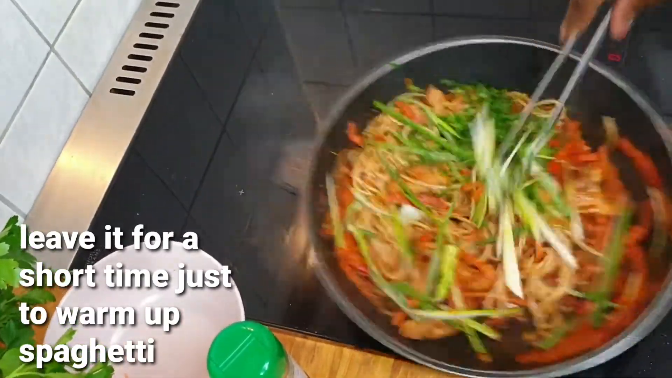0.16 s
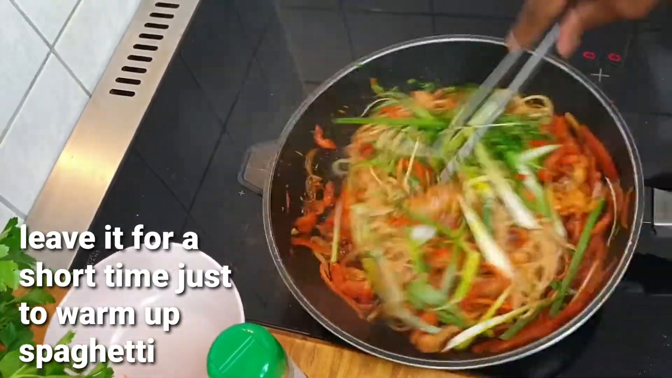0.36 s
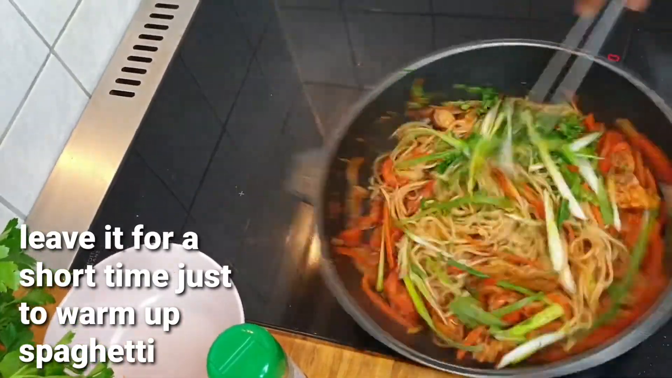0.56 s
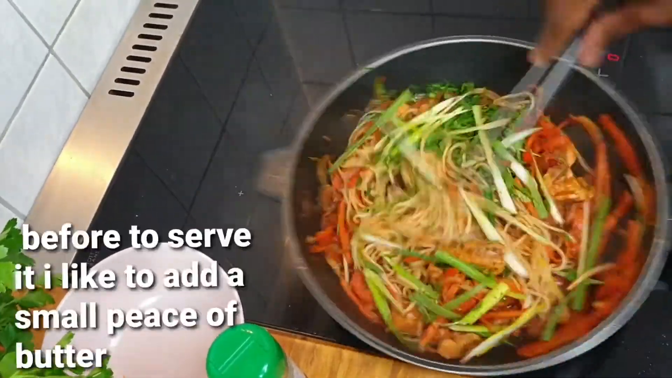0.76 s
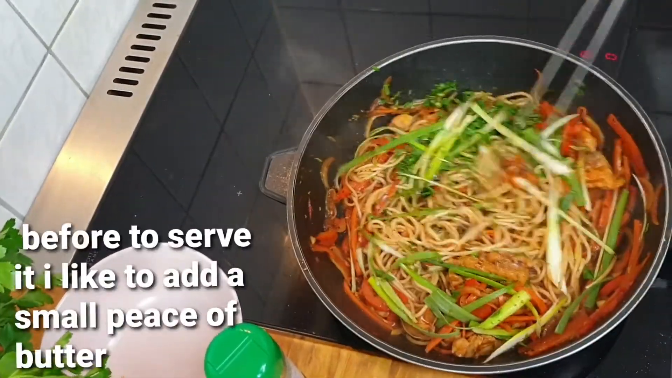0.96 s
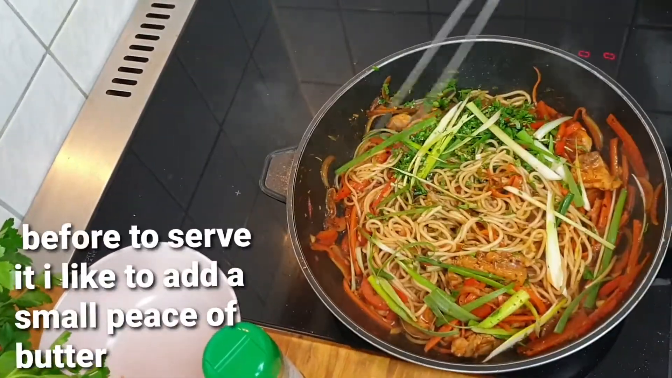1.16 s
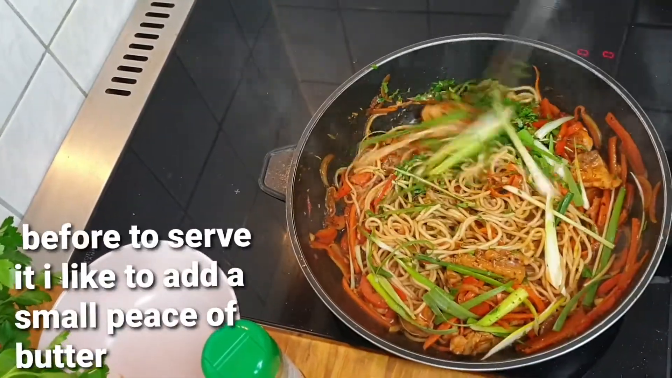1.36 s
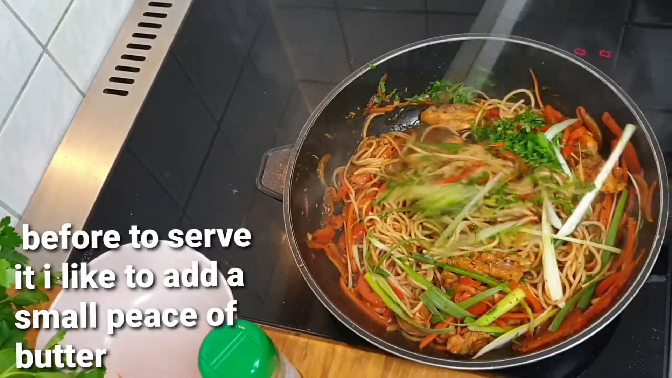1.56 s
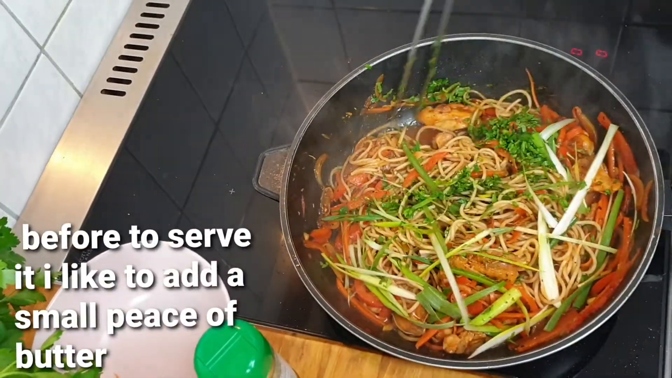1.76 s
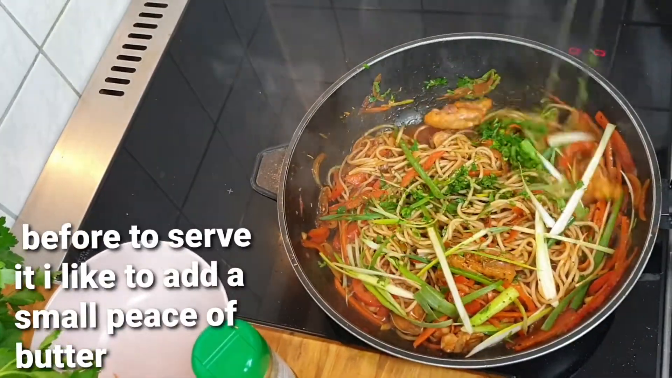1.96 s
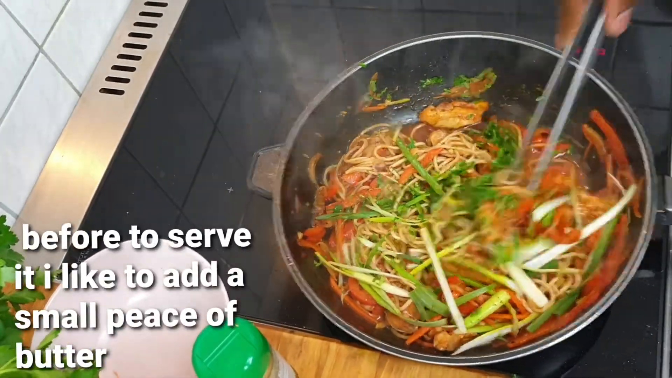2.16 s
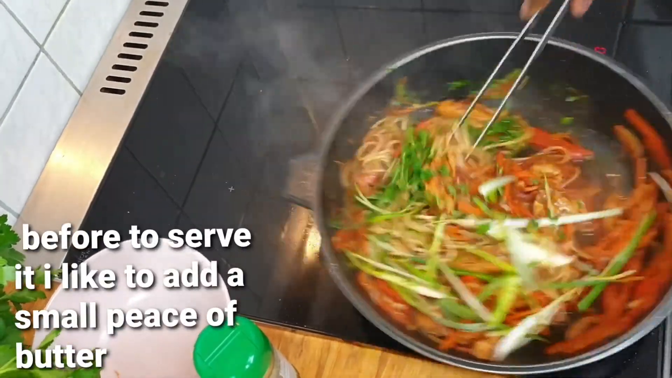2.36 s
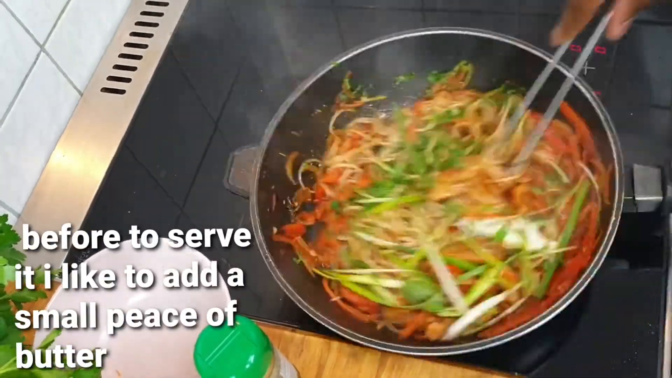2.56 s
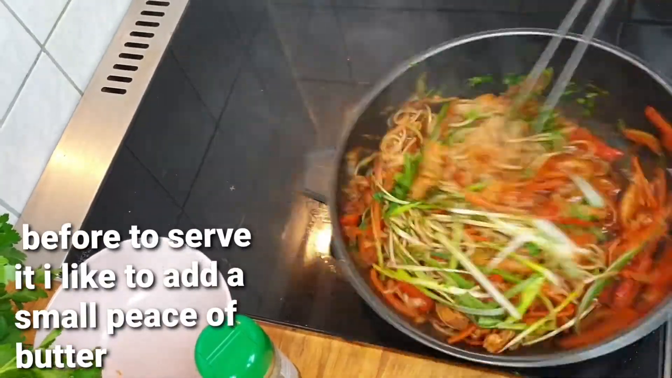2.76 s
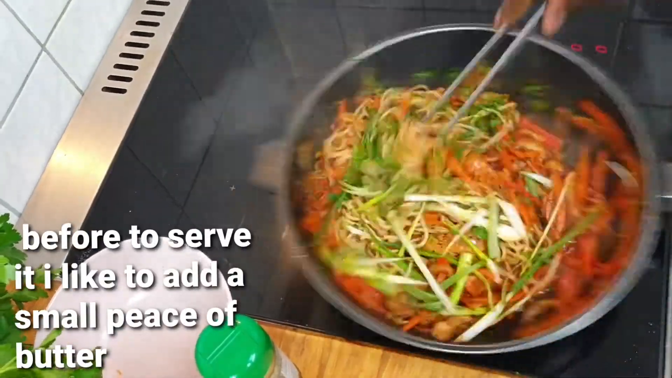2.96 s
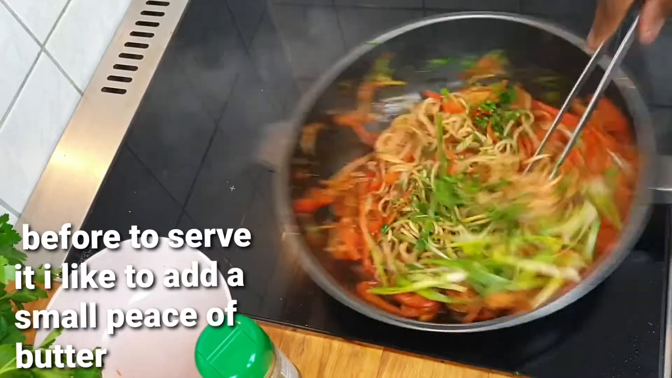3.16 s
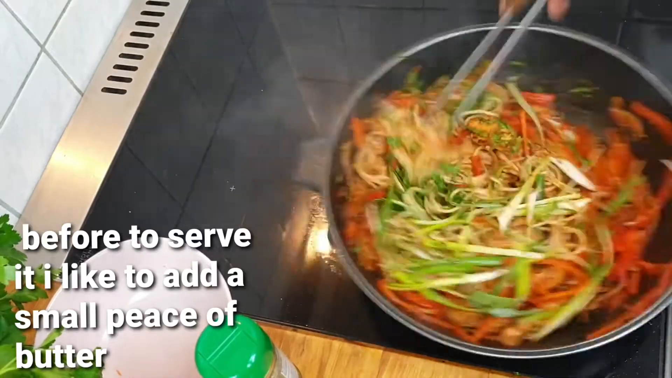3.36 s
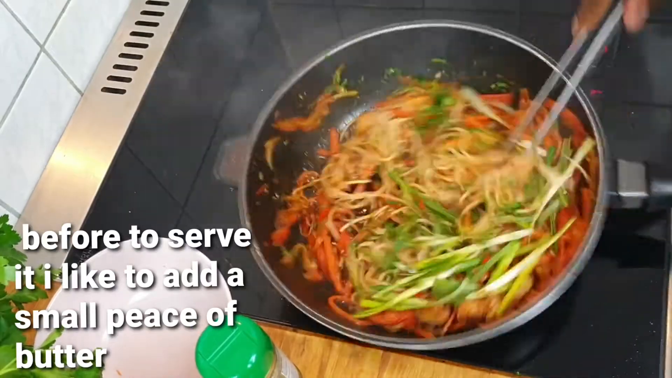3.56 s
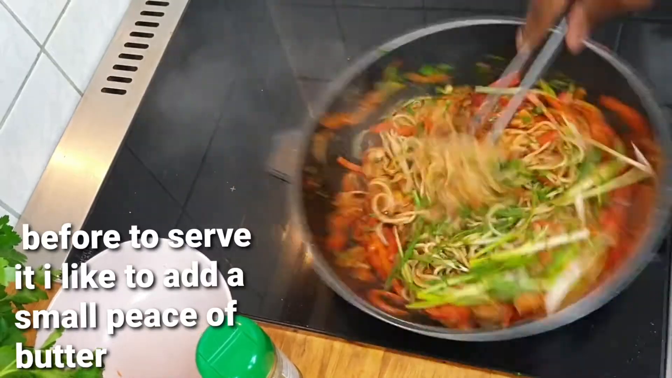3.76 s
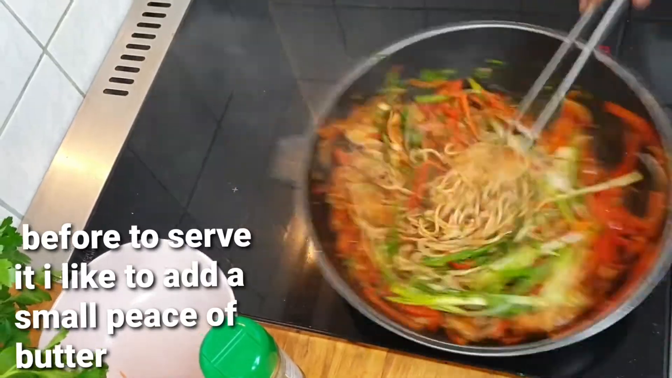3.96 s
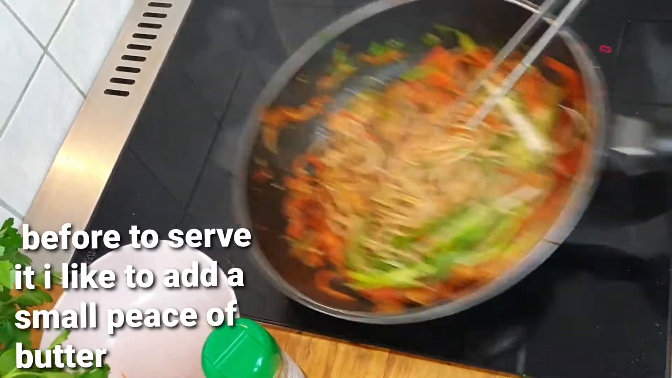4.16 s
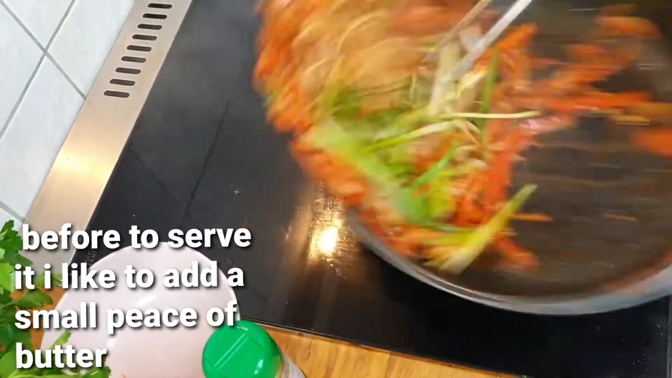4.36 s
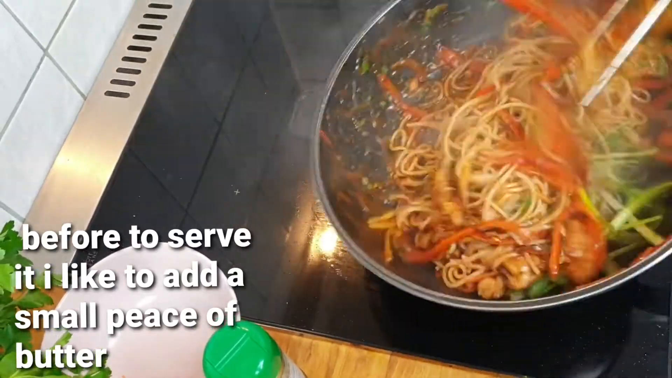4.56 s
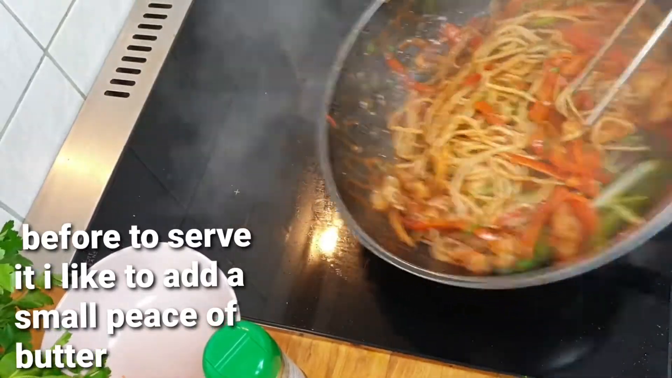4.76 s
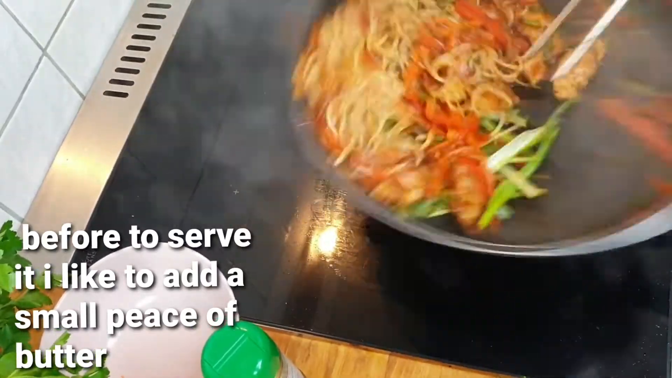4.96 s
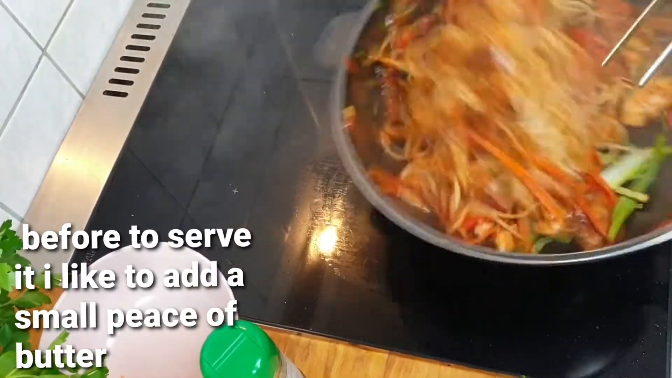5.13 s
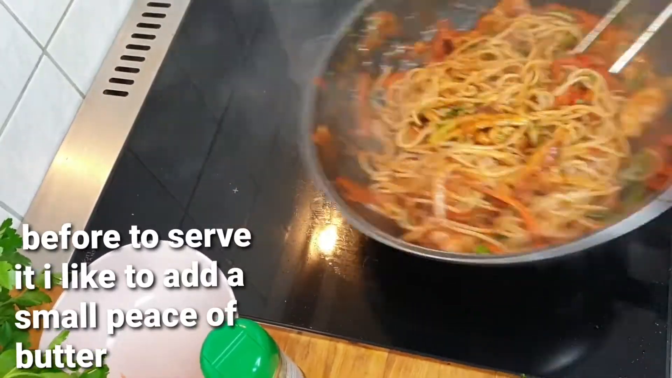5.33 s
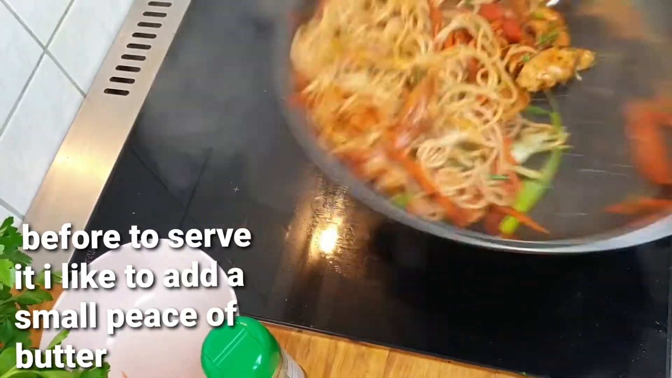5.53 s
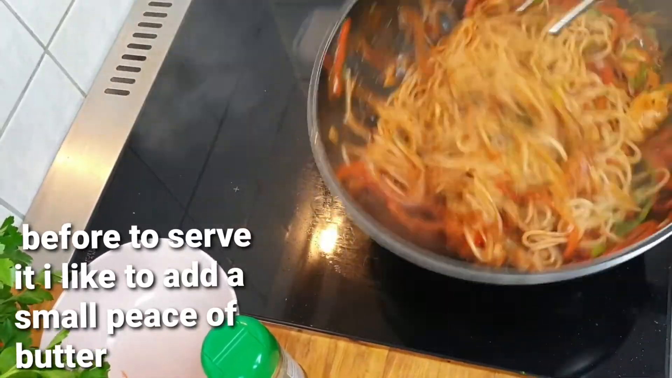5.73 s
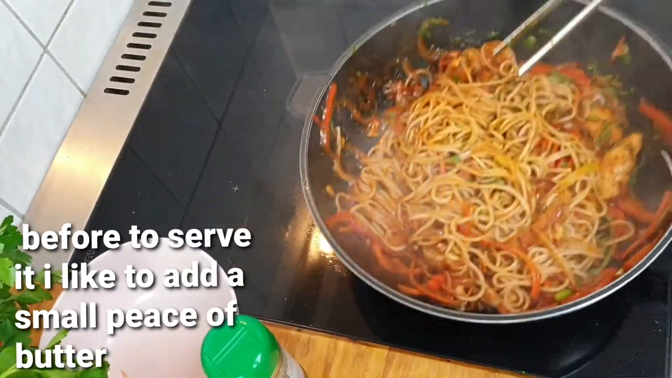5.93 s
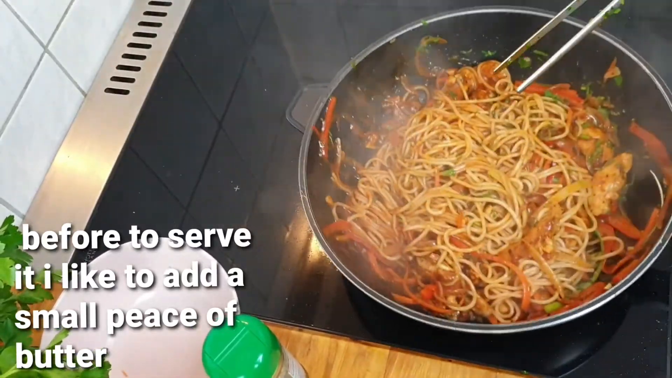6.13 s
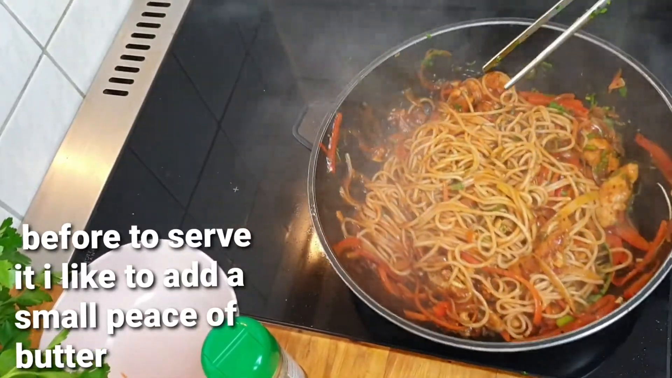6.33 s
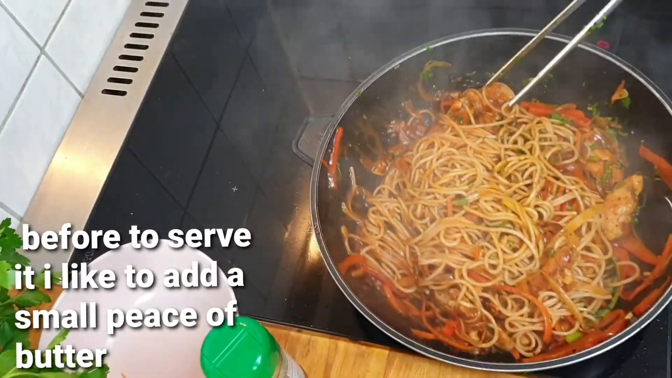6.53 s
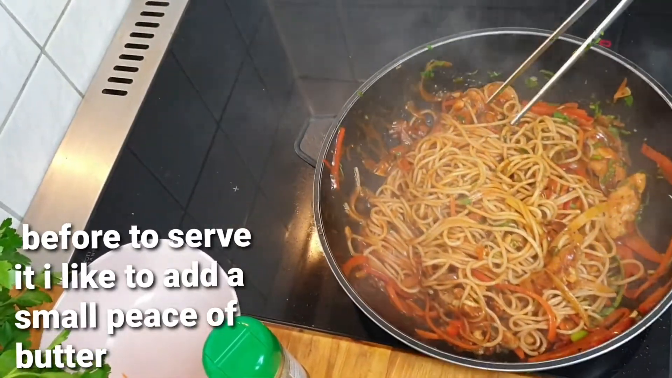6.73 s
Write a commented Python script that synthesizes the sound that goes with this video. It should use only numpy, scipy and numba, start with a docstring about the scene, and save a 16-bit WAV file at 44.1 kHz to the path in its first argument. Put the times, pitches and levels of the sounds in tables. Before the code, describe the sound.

A close phone microphone catches a pan being shaken on a glass hob: dull knocks, grinding base, thin metallic tong clinks and two brief squeaky drags. Light sizzle flares and fades over a low extractor fan, with a faint high whistle in the first half. After a quieter spell with the pan raised, a heavy landing booms and rings, followed by a few knocks. Short hard kitchen echo.

```python
"""A pan thuds on a glass hob amid sizzling while steel tongs, tossing spaghetti, clink on it throughout.
Blows are noisy contacts plus decaying modes; two squeaking drags are noise through gliding resonances.
Sizzle, sliding, rumble and the extractor fan are filtered noise with moving levels; the sizzle fades
as the pan is lifted. Thin whistles flutter; the small tiled kitchen echoes the metal; a phone hears it from above.
"""
import sys
import numpy as np
from scipy import signal
from scipy.fft import rfft, irfft, next_fast_len
from scipy.io import wavfile
from scipy.ndimage import uniform_filter1d
from numba import njit

SR = 44100
rng = np.random.default_rng(int(sys.argv[2]) if len(sys.argv) > 2 else 0)


def bounce(signal):
    """Save signal as a 16-bit WAV file at the path given by the first command-line argument."""
    frames = np.transpose(np.atleast_2d(signal))
    limited = np.clip(frames, -1, 1)
    pcm = np.round(limited * 32767).astype(np.int16)
    wavfile.write(sys.argv[1], SR, pcm)


N = 299439  # samples, 6.79 s
HIT = 16384  # samples in one blow
HARDER_IS_SHORTER = 0.45  # dB of rise time lost for each dB of blow
HARDER_IS_DAMPED = 0.26  # dB of ring life lost for each dB of blow, as the hand bears down
NOTE_SPREAD, NOTE_LIFE = 0.07, 0.7  # reach of the loudest note [log frequency]; share of the ring it leads
BEAT_DEPTH = 0.65  # share of the ring level

# Tong tips landing on the pan, before the microphone's colour:
# (time [s], peak in 4-12 kHz [dB], 300-1500 Hz offset [dB], 1500-4000 Hz offset [dB], 8-12 kHz offset [dB],
#  loudest note [Hz], its lead [dB], clatter t60 [s], ring against clatter [dB])
TIP_BLOWS = [(0.151, -21, -4, -6, -7, 9100, 10, 0.057, -5),
             (0.4246, -17.5, -18.5, -14, -15, 9650, 17, 0.096, -6.5),
             (0.6898, -36, -39, -8, -14, 5040, 3, 0.05, -16),
             (0.838, -24.5, -32, 1.5, -2, 7560, 18.5, 0.064, 5),
             (0.8595, -27.5, -2, -8.5, -13, 3560, 33, 0.136, -6),
             (1.4797, -6, -21.5, -29, 0.5, 9600, 2, 0.058, -12.5),
             (1.4835, -6.5, -28, -18.5, 0, 7900, 6, 0.045, -4),
             (1.491, -14, -15, -19.5, -3, 1915, 21.5, 0.19, -9.5),
             (1.981, -36, -16, -4.5, -11.5, 7300, 11, 0.22, -9),
             (2.163, -33, 1, -10, -8.5, 8860, -3, 0.046, -2),
             (2.2992, -20.5, -16, -12, -12, 8500, 2, 0.1, -10),
             (2.6105, -30, -4, -8, -5.5, 894, 14, 0.23, -3),
             (2.6326, -18.5, -10, -9.5, -10.5, 8300, 17, 0.093, -7),
             (2.957, -25.5, 1, -21, -5.5, 9600, 13, 0.048, -4),
             (3.266, -34.5, -18, -10, -16, 3870, 6, 0.27, -1),
             (3.2847, -16, -3, -11, -5.5, 1920, 31, 0.14, -9.5),
             (3.379, -44, -4, 5, -14, 1900, 4, 0.077, 2), (3.495, -31, -10, -3.5, -15, 1200, 32, 0.34, 3.5),
             (3.577, -35, -7, -9, -13, 1070, 4, 0.07, -4),
             (3.5947, -20.5, 3.5, -5, -1.5, 8500, 15, 0.11, -6.5),
             (3.7898, -37, 3.5, -8, -12, 1100, 3, 0.3, -3), (4.0882, -42.5, -26, 1, 0, 8560, 8, 0.47, -11),
             (4.243, -40.5, -20, -12, 6, 10100, 3, .04, -12),
             (4.3765, -36.5, -8, -3, 1, 10000, 20, .09, -13),
             (4.5105, -18, -12, -5, -15, 1920, 19, 0.11, 5.5),
             (4.5132, -17.5, -14.5, -10, -22.5, 2120, 8, 0.24, 2.5),
             (4.5225, -29.5, -9, -15, -29, 2186, 18, .2, -6),
             (4.7097, -38.5, -3, -5.5, -5.5, 1390, 6, 0.74, -4),
             (4.9132, -42, -5, -4, -5, 1080, 7, 0.17, -6), (4.9372, -40.5, -20, -30, 2, 9150, 7, 0.29, -16),
             (4.96, -45, -15, -17, -3, 9200, 5, 0.051, -12), (5.033, -49, -22, -15, 2, 8900, 5, 0.067, -11),
             (5.196, -48, -18, -20, -1, 9100, 4, .08, -9.5),
             (5.522, -39.5, -35, -4.5, -11, 9430, 31.5, 0.17, -12)]
# Modes of the pan ringing freely: (frequency [Hz], level [dB], t60 [s])
PAN_MODES = [(660, -8, .12), (930, -7, .1), (1050, -4, .15), (1200, -8, .1), (1715, -10, .15),
             (1915, -2, .15), (2186, -1, .16), (2466, -7, .06), (2700, -6, .13), (3550, -9, .12),
             (3720, -7, .1), (4410, -5, .2), (4740, -12, .1), (5020, -8, .13), (5550, -5, .1),
             (6050, -8, .1), (6720, -6, .09), (7750, -5, .07), (8100, -5, .09), (8400, -4, .06),
             (8930, -5, .09), (9220, -4, .09), (9460, -5, .09), (10030, -8, .07), (10700, -10, .05)]


def clinks():
    """Impact between stiff bodies: brief contact is bright; wall and base share by where the tips land."""
    def tone(base_db, wall_db, top_db):
        return [(150, base_db), (900, base_db + 9.5), (2200, wall_db + 7.5), (3300, wall_db + 10),
                (5500, 0.42), (9000, top_db + 12), (14000, top_db + 9.5)]
    return hits(TIP_BLOWS + ticks(), PAN_MODES, tone, [4000, 12000], rise_s=0.0014, life=0.99)


def ticks(count=14):
    """Independent random arrivals: faint touches of the tips, as rows with the columns of the tip blows."""
    rows = []
    for when, size in rng.random((count, 2)):
        level_db = -54 + 3 * (2 * size - 1)
        rows.append((when * N / SR, level_db, -16, -18, 0, 9000, 6, 0.07, -8))
    return rows


# Pan base landing on the glass, before the microphone's colour:
# (time [s], peak in 250-1500 Hz [dB], bass offset [dB], 1.5-3 kHz offset [dB], treble offset [dB],
#  loudest note [Hz], its lead [dB], clatter t60 [s], ring against clatter [dB],
#  boom near 100 Hz [dB], hum at 240-320 Hz [dB])
BASE_BLOWS = [(0.016, -21, -32, -5, -12, 1464, 39, 0.079, -2, -60, -50),
              (0.027, -19.5, -9, -11, -17, 560, 5, 0.16, -3, -38, -40),
              (0.206, -22.5, -14, -3, -28, 870, 11, 0.092, 0, -58, -55),
              (0.219, -15.5, -22, -16, -18, 810, 1, 0.28, 6.5, -36, -35.5),
              (0.493, -29.5, -11, -4.5, -14, 600, 22, 0.083, 1.5, -41.5, -43),
              (0.635, -40, -12, -7, -2, 640, 15, 0.24, 0, -43, -45.5),
              (1.994, -34, -11, -5, 3.5, 560, 15, 0.34, 5, -44, -48),
              (2.036, -42.5, -6, -1, -9, 200, -1, 0.51, -6, -43.5, -64),
              (2.71, -33, -4, -12.5, -9.5, 200, 7, 0.34, -3.5, -34.5, -49),
              (2.723, -31.5, -8, -11, -4, 560, 15, 0.36, 2, -62, -48),
              (2.941, -36, -9, -2.5, -2, 460, 5, 0.68, -3.5, -43.5, -60),
              (3.105, -33, -9, 3, 4.5, 1184, 26, 0.14, 1.5, -53, -53),
              (3.39, -33, -17, -13, -12, 460, 20, .08, 4, -60, -53),
              (3.3943, -17, -15, -9, -9, 740, 22, 0.15, 10, -40, -37.5),
              (3.414, -21.5, -22, -33, -11, 660, 29, 0.4, 9, -59, -37.5),
              (3.8, -41, -4, -30, -5, 640, 9, 0.17, -20, -45, -62),
              (3.811, -35.5, -5, -21, -4, 560, -9, 0.15, 5, -46.5, -62),
              (4.167, -43.5, 0, -3, -26, 200, 2, 0.18, 8, -47, -58),
              (5.272, -42, -27, -1, -4, 1400, 29, 0.19, 3, -66, -72),
              (5.599, -43.5, -7.5, -10.5, -11.5, 200, 4, 0.12, 2, -65, -51.5),
              (6.0046, -5.5, -18, -8, -7.5, 690, 13, 0.13, 3, -34, -26),
              (6.04, -15, -28, -26, -18, 765, 11.5, 0.4, 6, -62, -39),
              (6.066, -19, -8, -22, -23, 640, 25, 0.3, 6, -48, -58),
              (6.258, -44, -15, -33, -34, 460, 5.5, 0.17, -9, -44, -54),
              (6.317, -17, -19, -9, -12, 1178, 20, 0.22, 7.5, -45.5, -38.5)]
# Modes of the hob ringing freely: (frequency [Hz], level [dB], t60 [s])
HOB_MODES = [(200, -2, .12), (371, -4, .2), (460, -3, .16), (560, -3, .16), (640, -1, .18), (700, 0, .15),
             (764, -2, .18), (899, -2, .16), (1030, -2, .13), (1178, -3, .08), (1420, -4, .1),
             (1560, -6, .1), (1750, -6, .1), (1925, -1, .12), (2190, -3, .12), (2450, -3, .09),
             (2650, -4, .08)]


def thuds():
    """Impact of a heavy base over a broad area: slow contact favours the low modes of the glass."""
    def tone(bass_db, knock_db, top_db):
        return [(40, bass_db - 18), (110, bass_db + 10.5), (300, -2.8), (1200, -0.26), (1900, knock_db + 5),
                (2700, knock_db - 4), (3600, top_db - 3.5), (5500, top_db - 4.5), (11000, top_db - 16)]
    rows = [row[:-2] for row in BASE_BLOWS]  # boom and hum are played by booms()
    return hits(rows, HOB_MODES, tone, [250, 1500], rise_s=0.0047, life=0.94)


# Deepest modes of the hob: (frequency [Hz], level against boom or hum [dB], t60 [s])
GLASS_MODES = [(95.4, 3.5, 0.3), (110.1, 3.5, 0.47), (246.2, 0, 0.46), (261.3, -3.5, 0.41), (315, -2, .5)]


def booms():
    """Modal superposition: each landing swells the deepest glass modes, which beat as they fade."""
    out = np.zeros(N + SR)
    t = np.arange(SR) / SR
    swell = 1 - np.exp(-t / 0.015)
    for row, phases in zip(BASE_BLOWS, rng.random((len(BASE_BLOWS), len(GLASS_MODES)))):
        start = int(row[0] * SR)
        boom_db, hum_db = row[-2:]
        for (hz, db, t60), phase in zip(GLASS_MODES, phases):
            gain = undb(db + (boom_db if hz < 150 else hum_db))
            out[start:start + SR] += swell * gain * np.sin(2 * np.pi * hz * t + phase) * fade(t, t60)
    return out[:N]


def hits(table, modes, tone_of, band_hz, rise_s, life):
    """Superposition in time of blows scaled to their band peaks; rise_s holds at -12 dB, life at -22 dB."""
    out = np.zeros(N + HIT)
    band = signal.butter(2, band_hz, "bandpass", fs=SR, output="sos")
    chances = rng.standard_normal((len(table), HIT + 64))
    for (s, db, *offsets, note_hz, note_db, t60, ring_db), chance in zip(table, chances):
        rise = rise_s * undb(-HARDER_IS_SHORTER * (db + 12))
        damped_life = life * undb(-HARDER_IS_DAMPED * (db + 22))
        blow = strike(modes, tone_of(*offsets), note_hz, rise, t60, ring_db, note_db, damped_life, chance)
        peak = np.sqrt(uniform_filter1d(signal.sosfilt(band, blow) ** 2, 128).max())
        start = int(s * SR)
        out[start:start + HIT] += blow * undb(db) / peak
    return out[:N]


def strike(modes, tone, note_hz, rise, clatter_t60, ring_db, note_db, life, chance):
    """Source and resonator: a crack and chattering contacts, with modes left ringing, most near one note."""
    t = np.arange(HIT) / SR
    noise = chance[:HIT]
    bumpy = undb(np.repeat(chance[::64], 64)[:HIT])  # contacts come and go
    dull = signal.lfilter([0.25], [1, -0.75], noise)
    sharp = noise - dull
    contacts = dull * fade(t, clatter_t60) + sharp * fade(t, 0.52 * clatter_t60)  # treble dies sooner
    chatter = np.minimum(t / max(rise, 2e-4), 1) * bumpy * contacts
    chatter += noise * np.minimum(t / 0.0014, 1) * fade(t, 0.018)  # the crack

    # every mode of a slightly uneven body is a close pair, so it beats; food and hand shorten the ring
    ring = np.zeros(HIT)
    for k, (hz, db, t60) in enumerate(modes):
        nearness = np.exp(-(np.log(hz / note_hz) / NOTE_SPREAD) ** 2)
        lead = 1 + (undb(note_db * nearness) - 1) * fade(t, NOTE_LIFE * t60)
        beat = 1 + BEAT_DEPTH * np.sin(2 * np.pi * 0.025 * hz * chance[-2 - k] * t + k)
        tone_wave = np.sin(2 * np.pi * hz * t + 4 * chance[-33 - k])
        ring += undb(db) * lead * tone_wave * fade(t, min(life, 1.2) * t60) * beat
    ring *= np.minimum(t / 0.0013, 1)

    # doubled dB: the minimum-phase step takes the square root of the magnitude
    gains = undb(2 * read(tone, np.linspace(0, SR / 2, 513)))
    prototype = signal.firwin2(1023, np.linspace(0, 1, 513), gains)
    tone_filter = signal.minimum_phase(prototype, n_fft=16384)
    chatter, ring = (signal.fftconvolve(part, tone_filter)[:HIT] for part in (chatter, ring))
    return unit(chatter) + undb(ring_db) * unit(ring)


TIP_DAMPING = 3.5  # factor by which the dragging tip widens the resonances
TIP_SHIFT = 0.098  # share of the pitch change, in log frequency, that the treble resonances follow
# Two drags of a tip over the pan, each a list of
# (time [s], level [dB], low resonances against high [dB], pitch of the resonances [factor])
DRAGS = [
    [(1.5, -40, 0, 1.2), (1.515, -37, -3, 0.98), (1.54, -27.5, -7.5, 0.85), (1.582, -46.5, 5, 0.94),
     (1.615, -30.5, -7, .98), (1.648, -25.5, -15, 0.94), (1.694, -36.5, 1, 0.99), (1.71, -30, -7, 1.03),
     (1.76, -62, 7, 0.76)],
    [(3.495, -27.5, -1.5, 0.9), (3.525, -40, 13, 0.985), (3.537, -45, 2, 1.07), (3.557, -60, 14, 1.05),
     (3.57, -56, 0, 1.04)],
]
# Resonances of the tongs: (frequency [Hz], width before the tip's damping [Hz], level [dB])
TONG_RESONANCES = [(1170, 46, -1.5), (2140, 48, -3.5), (2956, 25, -6), (3620, 44, -5), (4670, 33, -2),
                   (5510, 250, 6), (6590, 73, 3.5), (7480, 57, 3.5), (8370, 38, 2.5), (8900, 61, -0.5),
                   (9420, 60, -4.5), (9700, 170, -0.5)]


def scrapes():
    """Friction excitation: dense uneven slips of the tip shake tong resonances whose pitch wanders."""
    out = np.zeros(N)
    for rows in DRAGS:
        s, db, low_db, pitch = np.transpose(rows)
        a, b = int(s[0] * SR), int(s[-1] * SR)
        t = np.arange(a, b) / SR
        slips = spit(1.7, 1500)[a:b]
        shift = np.interp(t, s, pitch) + 0.006 * walk(25)[a:b]
        low, high = 0, 0
        for hz, width, mode_db in TONG_RESONANCES:
            centre = hz * (shift if hz < 2600 else shift ** TIP_SHIFT)
            once = glide(slips, centre, TIP_DAMPING * width)
            squeak = undb(mode_db) * unit(glide(once, centre, 2 * TIP_DAMPING * width))
            if hz < 2600:
                low = low + squeak
            else:
                high = high + squeak
        rasp_tone = [(2700, -26), (4000, -7), (5500, 0), (8500, -0.5), (10500, 7), (13000, 4.5)]
        rasp = undb(-2) * unit(colour(slips, rasp_tone))  # unpitched
        level = undb(np.interp(t, s, db) + 1.78 * walk(60)[a:b])
        out[a:b] += level * (unit(high) + rasp + undb(np.interp(t, s, low_db)) * unit(low))
    return out


# Relative spectrum of the sizzle: (frequency [Hz], density [dB])
SIZZLE_TONE = [(1180, -56.5), (2000, -8), (2190, -20), (2770, -3.5), (3000, -5.5), (3930, -5), (5360, -3.5),
               (5860, -8.5), (9090, 2.5), (12300, -19), (13200, -41.5), (14000, -48.5)]
# The sauce sizzles while the pan touches the heat: (time [s], level before flutter [dB])
SIZZLE_LEVEL = [(0.0, -49), (0.72, -55), (1.47, -53.5), (1.64, -50), (3.48, -52.5), (3.69, -51.5),
                (3.86, -59), (4.76, -65.5), (5.05, -68.5), (5.46, -61), (5.65, -67.5), (6.03, -69.5),
                (6.2, -69), (6.47, -68), (6.79, -74)]
# Flares as food lands on the hot wall: (time [s], peak before flutter [dB])
FLARE_PEAKS = [(.19, -58), (1.62, -44), (2.25, -66), (4.1, -66), (4.28, -50.5), (4.36, -51.5),
               (4.95, -55.5), (5.26, -63), (6.26, -65.5)]


def sizzle():
    """Shot noise: sauce spits in tiny bursts, flaring and fading with its contact with the heat."""
    level = level_line(SIZZLE_LEVEL) + swells(FLARE_PEAKS, rise_t60=0.18, fall_t60=0.22)
    tone = [(1500, -32)] + SIZZLE_TONE  # flat below 1500 Hz
    return unit(colour(spit(2.4, 300), tone)) * level * undb(2 * walk(21.986))


# Relative spectrum of the sliding: (frequency [Hz], density [dB])
SLIDE_TONE = [(88, -38), (150, -7), (249, 0.5), (286, -13), (415, -1.5), (496, 0), (680, 5), (1330, -11),
              (1410, 0.5), (4000, -24.5), (5200, -60), (8800, -120)]
# The base slides on the glass as the pan is shaken: (time [s], level before flutter [dB])
SLIDE_LEVEL = [(0, -51), (.4, -50.5), (1.1, -58), (1.8, -55), (2.1, -52), (3.7, -51.5), (3.9, -55.5),
               (4.6, -57), (6.79, -58.5)]


def slide():
    """Friction noise: the base grinds over the glass with an uneven level."""
    flutter = undb(2.3 * walk(17) + 0.784 * walk(12))
    return unit(colour(rng.standard_normal(N), SLIDE_TONE)) * level_line(SLIDE_LEVEL) * flutter


# Relative spectrum of the rumble: (frequency [Hz], density [dB])
RUMBLE_TONE = [(12, -28.5), (20, -12), (86, 7.5), (178, -11.5), (220, -24.5), (290, -41.5), (480, -120)]
# Shoves of the pan that set the worktop rumbling: (time [s], peak before flutter [dB])
SHOVE_PEAKS = [(.05, -54), (.22, -45.5), (.65, -54.5), (1.54, -49), (2.17, -57), (3.14, -60.5), (3.46, -40),
               (3.69, -57), (4.22, -45.5), (4.84, -58), (5.72, -64), (6.05, -48), (6.37, -50)]


def rumble():
    """Structure-borne sound: low noise swells in the worktop around each shove, over a faint steady level."""
    level = undb(-62) + swells(SHOVE_PEAKS, rise_t60=0.25, fall_t60=0.89)
    return unit(colour(rng.standard_normal(N), RUMBLE_TONE)) * level * undb(4.2 * walk(11))


# Thin rough whistles: (start time [s], length [s], frequency [Hz], width of the narrower filter [Hz],
#  start level before flutter [dB], end level before flutter [dB])
WHISTLE_BANDS = [(0, 3.62, 8835, 170, -59, -56), (6.17, .15, 9050, 400, -64, -58),
                 (6.31, .1, 8900, 74, -51, -53), (6.1, .16, 7170, 70, -66, -67)]


def whistle():
    """Narrow-band noise: hiss through sharp resonances is heard as a fluttering pitch."""
    out, t = 0, np.arange(N) / SR
    for s, length, hz, width_hz, *db in WHISTLE_BANDS:
        band = resonate(resonate(rng.standard_normal(N), hz, width_hz), hz, 3 * width_hz)
        gate = np.clip(np.minimum(t - s, s + length - t) / 0.015, 0, 1)
        level_db = np.interp(t, [s, s + length], db) + 2 * walk(27) + 2.5 * walk(3.4)
        out = out + unit(band) * gate * undb(level_db)
    return out


# Relative spectrum of the extractor fan: (frequency [Hz], density [dB])
FAN_TONE = [(25, -20), (60, 4.5), (108, -6), (150, -11), (240, -7), (330, -15), (700, -13.5), (1100, -2),
            (1600, -14.5), (2900, -16), (3500, -39), (5500, -31), (9000, -41), (10500, -48), (11800, -79.5),
            (16000, -110)]


def extractor_fan():
    """Broadband flow noise: a steady coloured hum whose level wavers slightly around -56.5 dB."""
    return unit(colour(rng.standard_normal(N), FAN_TONE)) * undb(-56.5 + 1.33 * walk(13))


def kitchen(x):
    """Reverberation: dense echoes off tiles and cupboards decay, the treble sooner."""
    t = np.arange(SR // 2) / SR
    low = colour(rng.standard_normal(len(t)), [(1500, -0.5), (5000, -5)]) * fade(t, 0.51)
    high = colour(rng.standard_normal(len(t)), [(1500, -26), (5000, -7.5)]) * fade(t, 0.45)
    tail = (low + 0.8 * high) * np.minimum(t / 0.0069, 1)
    return signal.fftconvolve(x, tail / np.sqrt(np.sum(tail ** 2)))[:N] * undb(-13.5)


def undb(db):
    """Logarithmic level: dB to amplitude gain."""
    return 10 ** (np.asarray(db) / 20)


def unit(x):
    """Normalisation: scale to rms 1."""
    return x / np.sqrt(np.mean(x ** 2))


def fade(t, t60):
    """Exponential decay that loses 60 dB in t60 s, held to at least 5 ms."""
    return np.exp(-np.log(1000) * t / max(t60, 0.005))


def read(points, hz):
    """Interpolation on a log frequency axis: dB of a (Hz, dB) table at any frequency."""
    f, db = np.transpose(points)
    return np.interp(np.log(np.maximum(hz, 1)), np.log(f), db)


def colour(x, points):
    """Linear filtering in the frequency domain by a (Hz, dB) table."""
    n = next_fast_len(len(x))
    hz = np.arange(n // 2 + 1) * SR / n
    return irfft(rfft(x, n) * undb(read(points, hz)), n)[:len(x)]


def walk(rate):
    """Slow random modulation: levels drawn every 1 / rate s and slewed, with a spread a little below 1."""
    k = int(SR / rate)
    return uniform_filter1d(np.repeat(rng.standard_normal(N // k + 1), k), k)[:N]


def spit(scatter_db, per_s):
    """Shot noise: dense noise with louder one-sample bursts sprinkled in."""
    size = undb(scatter_db * rng.exponential(size=N)) * (rng.random(N) < per_s / SR)
    return rng.standard_normal(N) * (1 + size)


def level_line(rows):
    """Amplitude envelope: gain along straight dB lines between (s, dB) rows."""
    return undb(np.interp(np.arange(N) / SR, *np.transpose(rows)))


def swells(rows, rise_t60, fall_t60):
    """Exponential envelope: gain grows to each (s, dB) peak and dies away again."""
    t = np.arange(N) / SR
    out = np.zeros(N)
    for s, db in rows:
        rise = fade(s - np.minimum(t, s), rise_t60)
        fall = fade(np.maximum(t, s) - s, fall_t60)
        out += undb(db) * np.where(t < s, rise, fall)
    return out


def resonate(x, hz, width_hz):
    """Second-order resonance, gain 1 at its centre."""
    return signal.lfilter(*signal.iirpeak(hz, hz / width_hz, fs=SR), x)


@njit
def glide(x, hz, width_hz):
    """Time-varying second-order resonance whose centre moves, gain 1 at the centre."""
    y, band, low = np.empty(len(x)), 0., 0.
    for i in range(len(x)):
        g, k = np.tan(np.pi * hz[i] / SR), width_hz / hz[i]
        v = (band + g * (x[i] - low)) / (1 + g * (g + k))
        band, low, y[i] = 2 * v - band, low + 2 * g * v, k * v
    return y


# Colour the microphone gives the blows and scrapes: (frequency [Hz], gain [dB])
MIC_TONE = [(200, -5.5), (3300, -9.5), (6000, -7), (9000, -3.5), (10500, -10.5), (12000, -18),
            (14500, -38.5)]


def scene():
    """Superposition: blows and scrapes with echoes over the other sounds; one microphone feeds both channels."""
    metal = colour(clinks() + thuds() + scrapes(), MIC_TONE)
    pan_noise = sizzle() + slide() + rumble()
    mono = metal + kitchen(metal) + booms() + pan_noise + whistle() + extractor_fan()
    return np.array([mono, mono])


def record(dry):
    """Band limiting: the phone cuts the top above 15.4 kHz with a steep elliptic low-pass."""
    return signal.sosfilt(signal.ellip(8, 0.2, 70, 15400, fs=SR, output="sos"), dry)


dry = scene()
out = record(dry)
bounce(out)
```